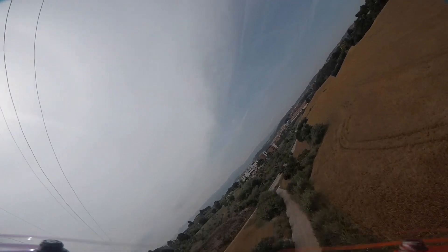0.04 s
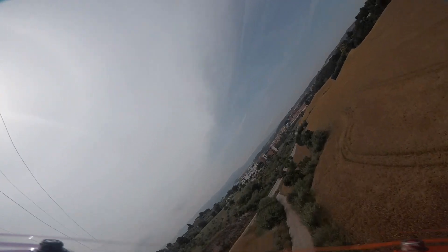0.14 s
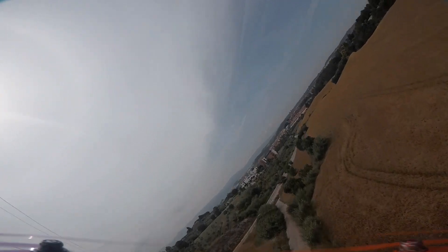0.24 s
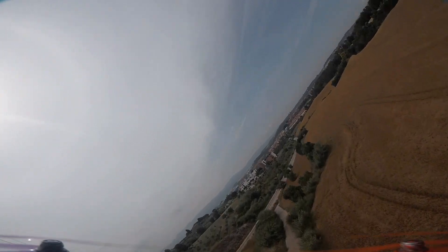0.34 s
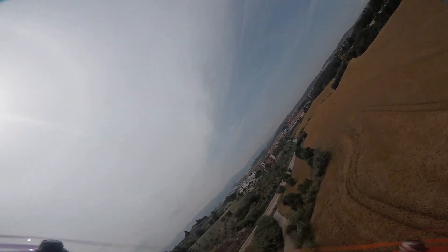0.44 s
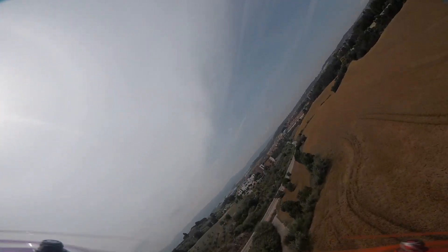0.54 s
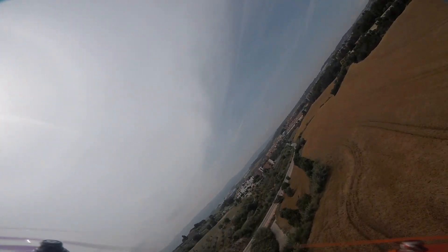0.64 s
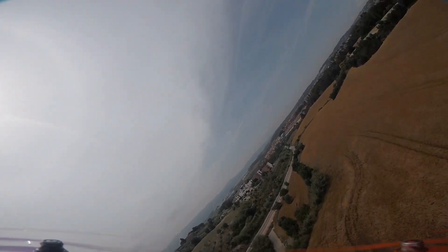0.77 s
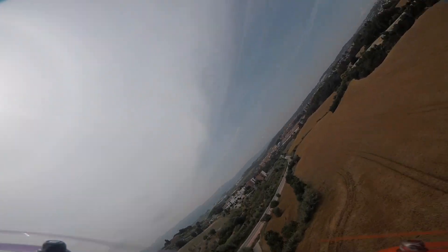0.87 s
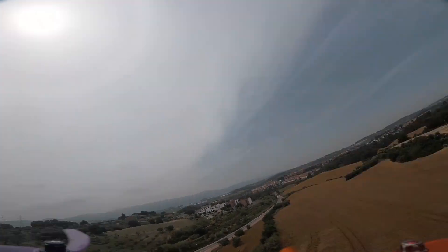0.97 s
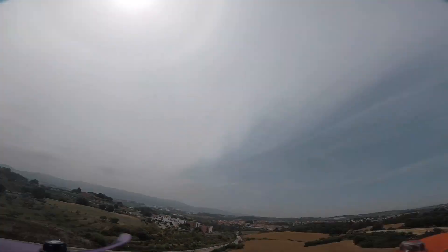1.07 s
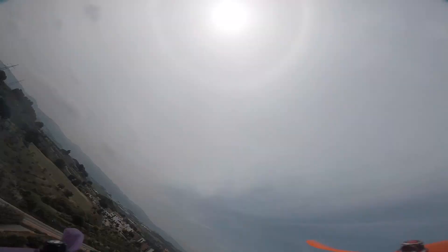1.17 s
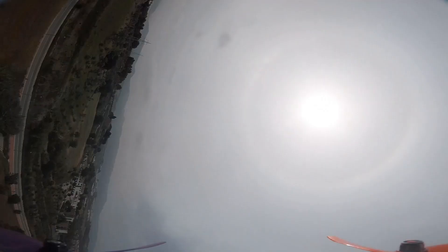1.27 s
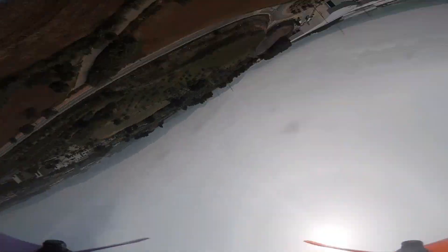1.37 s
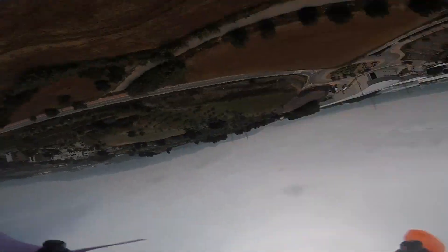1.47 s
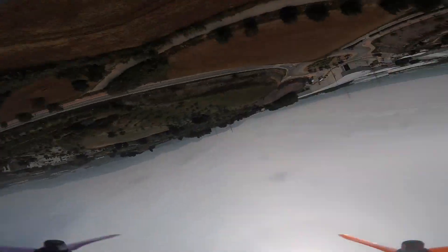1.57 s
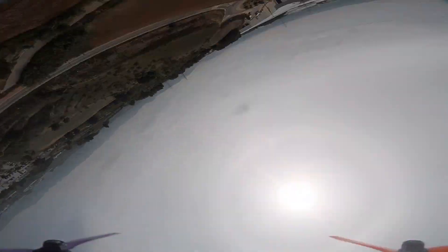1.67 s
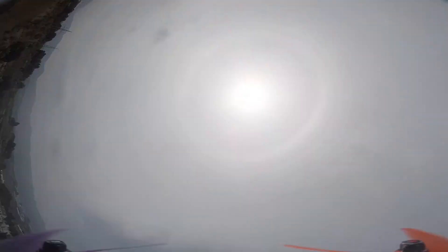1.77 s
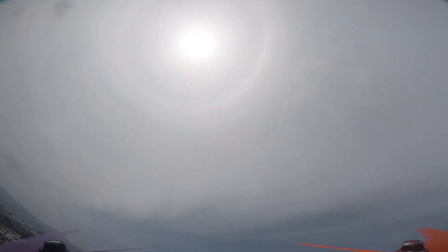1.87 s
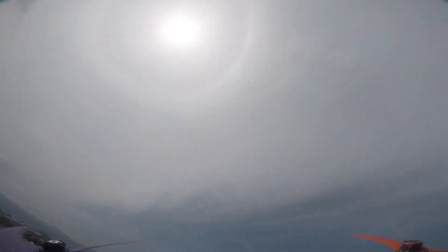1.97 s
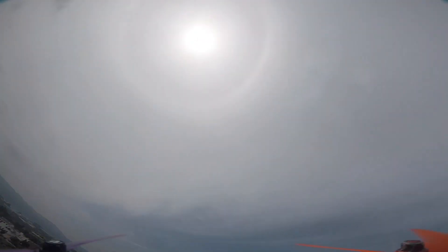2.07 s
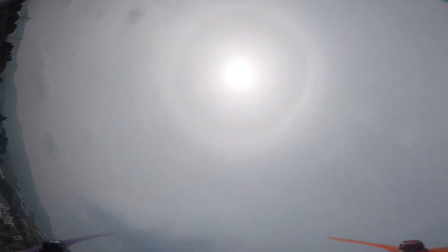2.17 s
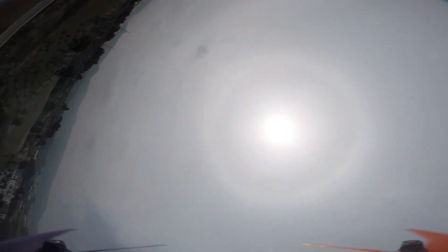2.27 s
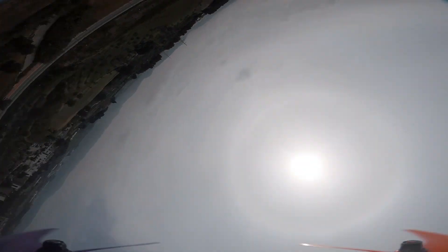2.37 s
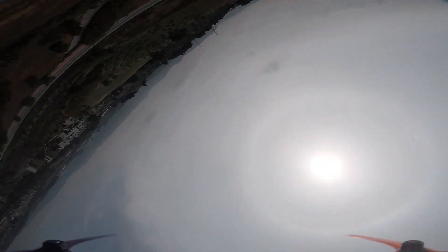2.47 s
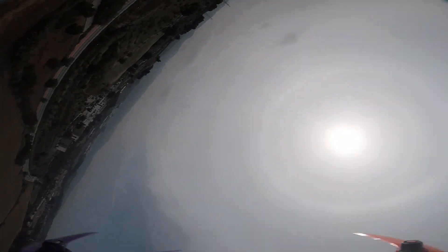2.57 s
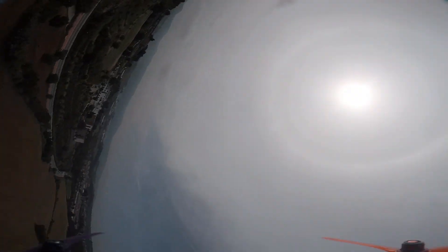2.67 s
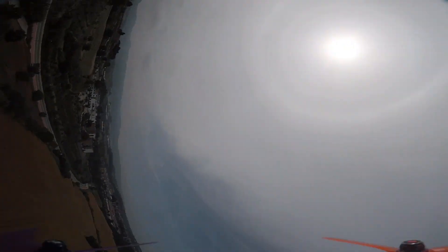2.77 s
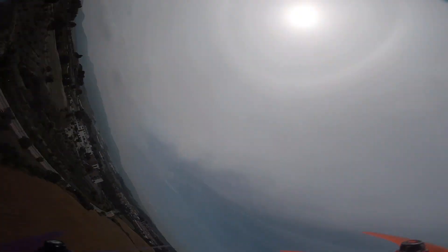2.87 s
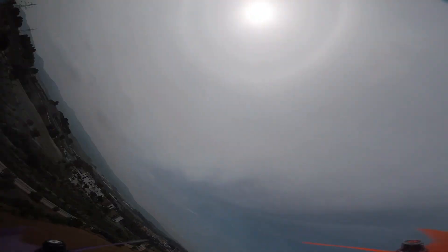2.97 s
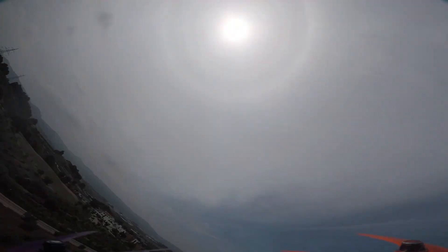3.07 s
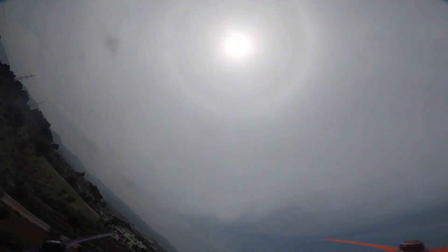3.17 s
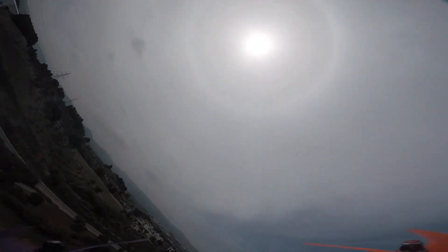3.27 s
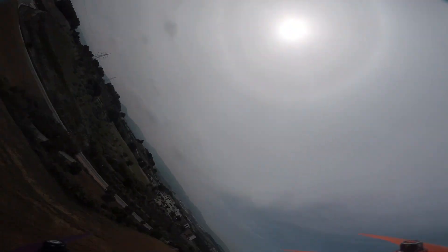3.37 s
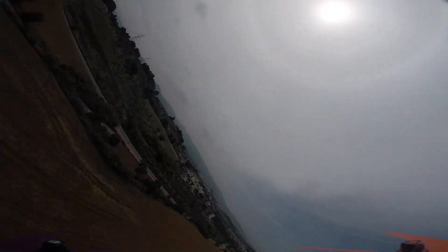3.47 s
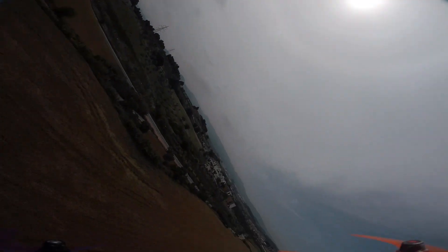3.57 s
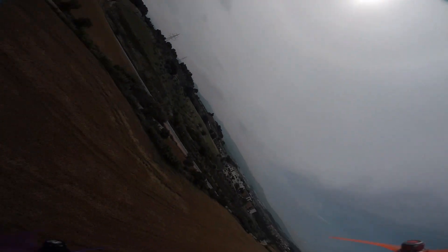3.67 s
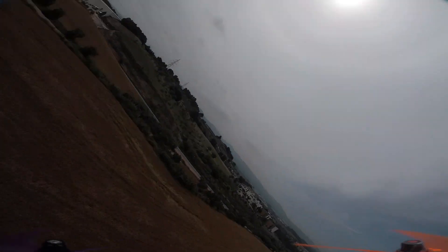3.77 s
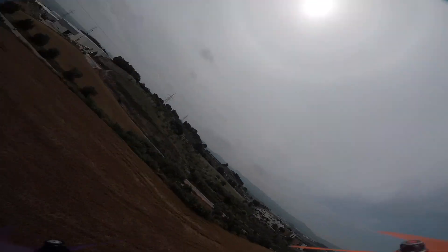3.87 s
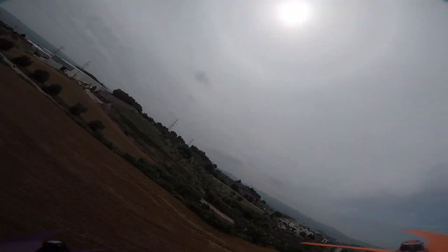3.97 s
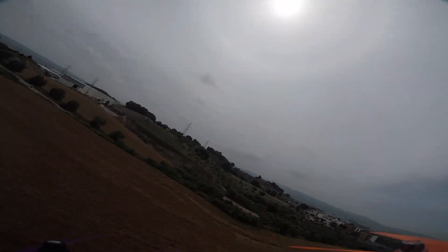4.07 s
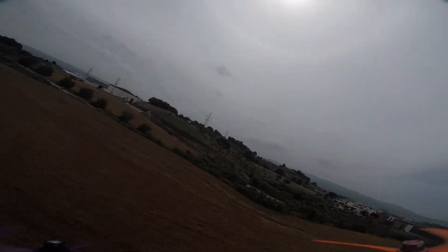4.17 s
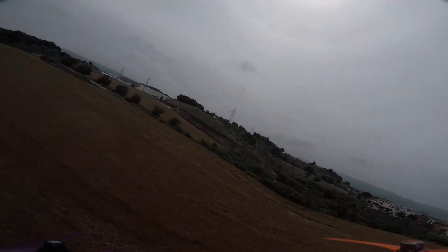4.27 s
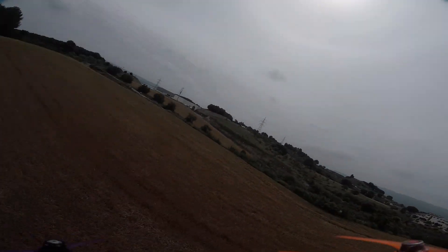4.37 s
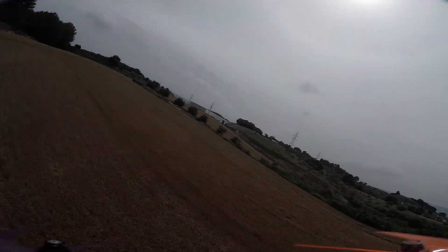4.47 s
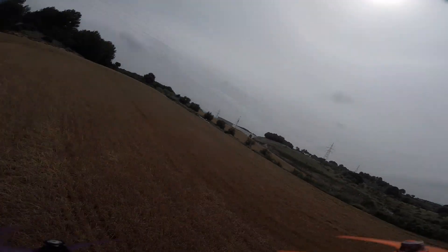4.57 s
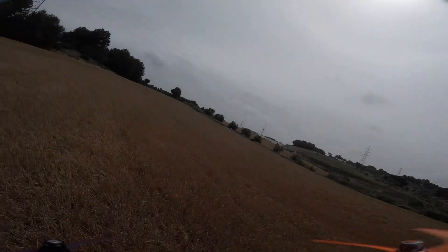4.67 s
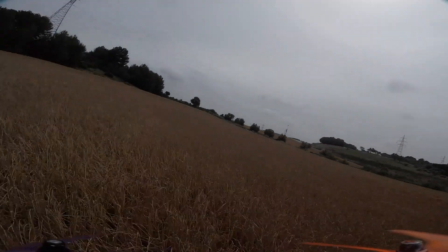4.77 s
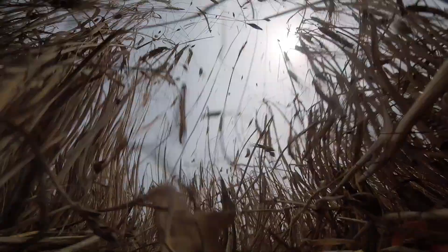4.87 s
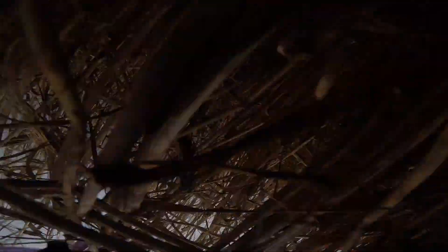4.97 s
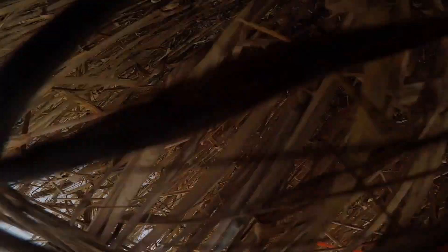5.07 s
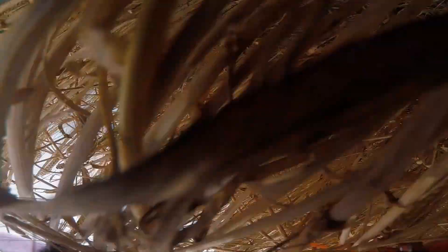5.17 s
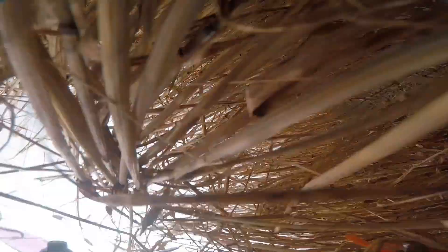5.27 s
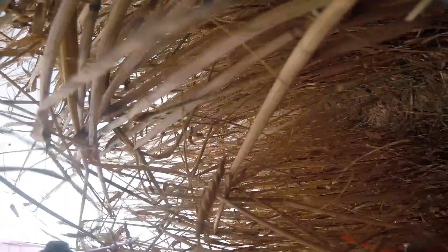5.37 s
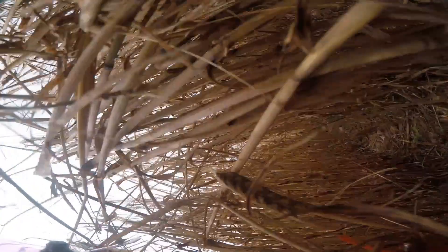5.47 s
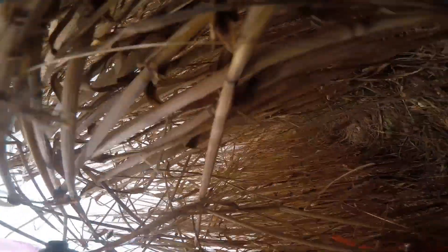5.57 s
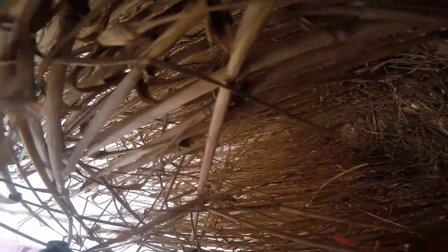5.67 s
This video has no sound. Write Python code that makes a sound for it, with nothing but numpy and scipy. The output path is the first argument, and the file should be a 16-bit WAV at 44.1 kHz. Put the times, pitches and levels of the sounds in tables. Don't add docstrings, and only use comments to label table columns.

```python
import sys
import numpy as np
from scipy import signal
from scipy.fft import rfft, irfft, next_fast_len
from scipy.io import wavfile
from scipy.ndimage import uniform_filter1d, map_coordinates

SR = 44100
rng = np.random.default_rng(int(sys.argv[2]) if len(sys.argv) > 2 else 0)


def ratio(d):
    e = np.asarray(d, float) / 20
    return 10 ** e


def file_out(sig):
    cols = np.atleast_2d(sig).T
    lim = np.clip(cols, -1, 1)
    pcm = np.round(lim * 32767).astype(np.int16)
    wavfile.write(sys.argv[1], SR, pcm)


N = 252869
T = np.arange(N) / SR


def unit(x):
    return x / np.sqrt(np.mean(x ** 2) + 1e-20)


def curves(rows, fade=0.0051):
    s, *cols = np.transpose(rows)
    opening = (T - s[0]) / fade + (s[0] == 0)
    closing = (s[-1] - T) / fade + 1
    gate = np.clip(np.minimum(opening, closing), 0, 1)
    return [np.interp(T, s, c) for c in cols], gate


def wobble(rate, times=T):
    return map_coordinates(rng.standard_normal(int(N * rate / SR) + 4), [times * rate])


def glide(points, times):
    s, v = np.transpose(points)
    return map_coordinates(v, [np.interp(times, s, np.arange(len(s)))], mode="nearest")


def coloured(x, spectrum):
    m = next_fast_len(N + 8192)
    f, db = np.transpose(spectrum)
    log_f = np.log(np.fft.rfftfreq(m, 1 / SR) + 1)
    gain = ratio(np.interp(log_f, np.log(f + 1), db))
    return unit(irfft(rfft(x, m) * gain, m)[:N])


def patchy(depth_db):
    z = signal.stft(rng.standard_normal(N + 512), nperseg=512)[2]
    field = uniform_filter1d(rng.standard_normal(z.shape), 6, 0)
    field = uniform_filter1d(field, 10, 1)
    return signal.istft(z * ratio(depth_db * unit(field)), nperseg=512)[1][:N]


def add(out, s, burst):
    part = out[round(s * SR):][:len(burst)]
    part += burst[:len(part)]


def full_throttle(rows, voice, run_down):
    coast_s, fade_bend = .12, 2.0
    s, hz, load_db, sixth_db = np.transpose(rows)
    t = np.linspace(0, s[-1] + coast_s, num=200)
    coast = np.clip((t - s[-1]) / coast_s, 0, 1)
    fade = coast ** fade_bend
    speed_lost, speed_bend = run_down
    speed = np.interp(t, s, hz) * (1 - speed_lost * coast ** speed_bend)
    shaft_db = voice[0] - 24 * fade
    blade_db = np.interp(t, s, load_db) - 30 * fade
    extra_db = np.interp(t, s, sixth_db)
    return np.transpose([t, speed, shaft_db, voice[1] + blade_db,
                         voice[2] + blade_db + extra_db, voice[3] + blade_db])


def hunting(speed, load, sixth_db, ninth_db):
    # shaft f/Hz, level/dB
    unbalance = [(65, -33), (87, -40.5), (101, -25.5), (117, -19), (138, -26), (153, -32), (163, -19),
                 (172, -11.5)]
    # shaft f/Hz, level/dB
    blade_pass = [(65, -20.5), (87, -20.5), (104, -22.5), (130, -18), (146, -20), (161, -27.5),
                  (173, -25.5)]
    t = np.linspace(speed[0][0], speed[-1][0], num=300)
    s, shake_db, load_db, slap_db = np.transpose(load)
    hz = glide(speed, t)
    octaves = np.log2(hz / 144.6)
    upper_db = 5.5 * octaves + np.interp(t, s, slap_db)
    shaft_db = np.interp(hz, *np.transpose(unbalance)) + np.interp(t, s, shake_db)
    blade_db = np.interp(hz, *np.transpose(blade_pass)) + np.interp(t, s, load_db)
    return np.transpose([t, hz, shaft_db, blade_db, sixth_db + upper_db, ninth_db + upper_db])


def kick(s, length, first_hz, last_hz, db):
    edge_db, step_db = 30, -17
    u = np.linspace(0, 1, num=30)
    hz = first_hz + (last_hz - first_hz) * u ** 2.1
    shaft_db = db - edge_db * np.maximum(abs(u - .3) - .15, 0) * 2
    blade_db = db - 3 - edge_db * abs(u - .7)
    return np.transpose([s + length * u, hz, shaft_db, blade_db, blade_db + step_db, blade_db + step_db * 2])


def motor(stretches, fall_db, second_db, whine, uneven_db):
    # shaft multiple, level/dB re 9th order
    blade_orders = [(12, -4), (15, -6.5), (18, -11), (21, -21.5), (24, -30.5), (27, -36)]
    # shaft multiple, level/dB re 6th order
    uneven_orders = [(4, -20.5), (5, -26), (7, -33.5), (8, -37)]
    tone, beat = np.zeros(N), np.zeros(N)
    for rows in stretches:
        (hz, shaft_db, blade_db, sixth_db, ninth_db), gate = curves(rows)
        on = gate > 0
        slow = np.clip(1 - hz / 300, 0, 1)
        lag = slow[on]

        jitter = (.0008 + .004 * lag) * wobble(25, T[on])
        turn = 2 * np.pi * np.cumsum(hz[on] * (1 + jitter)) / SR
        is_kick = rows[-1][0] - rows[0][0] < .2
        turn += (.03 + is_kick * .28) * wobble(90, T[on])
        eddies = 0.13 * wobble(350, T[on])
        blur = .09 * lag * wobble(60, T[on])

        levels = [(1, shaft_db), (2, shaft_db + second_db), (3, blade_db), (6, sixth_db - 0.5), (9, ninth_db)]
        steep = 1 - .12 * slow
        for k, db in blade_orders:
            slow_db = 2.5 if k > 18 else -7
            fall = fall_db * (k / 3 - 3)
            levels.append((k, ninth_db + (db - fall) * steep + slow_db * slow))
        levels += [(k, sixth_db + db + uneven_db) for k, db in uneven_orders]
        whine_order, whine_db = whine
        levels.append((whine_order, ninth_db + whine_db - 25 * slow))

        for k, db in levels:
            fast_db = 1.3 + (k > 3) * 2 * lag + (k > 6) * 2 * lag
            flutter_db = fast_db * wobble(35, T[on]) + (k > 6) * 5 * lag * wobble(7, T[on])
            low_speed_db = (3.5 if k < 6 else 6) * lag
            load = ratio(db[on] + low_speed_db + flutter_db) * (1 + (k > 2) * eddies)
            phase = k * (turn + (k > 9) * blur) + rng.uniform(0, 2 * np.pi)
            tone[on] += np.sqrt(2) * gate[on] * load * np.sin(phase)
        beat[on] += gate[on] * np.cos(3 * turn)
    return tone, beat


def four_motors():
    # t/s, shaft f/Hz, blade load level/dB, 6th order extra level/dB
    full_rows = [
        [(0.0, 445.0, -3, 2), (0.16, 446.0, -2, 1), (0.24, 447.2, -2, 1), (0.33, 450.6, -1, 0),
         (0.54, 453.5, 0, -1), (0.64, 453.0, 1, 0), (0.87, 453.9, 0, 0)],
        [(0.0, 426.5, -4, -8), (0.08, 428.0, -3, -8), (0.14, 426.0, -3, -8), (0.21, 428.3, -2, 2),
         (0.28, 424.0, -2, 0), (0.33, 421.3, 0, -2), (0.4, 423.5, 1, 0), (0.52, 425.5, 2, 0),
         (0.64, 424.3, 0, 0), (0.74, 424.6, -1, 0), (0.87, 422.6, -2, 0)],
        [(0.0, 392.0, 0, -2), (0.14, 389.8, -3, 4), (0.24, 391.0, -4, 4), (0.33, 384.3, -5, 2),
         (0.44, 391.0, -1, 0), (0.5, 390.3, -2, -1), (0.6, 393.0, 4, -3), (0.65, 390.0, -4, 2),
         (0.76, 394.0, 2, -3), (0.81, 392.0, 1, 0), (0.87, 393.0, 1, 0)],
        [(0.0, 410.7, -12, 14), (0.08, 412.5, -13, 12), (0.125, 415.0, -11, 21), (0.16, 417.5, -9, 12),
         (0.2, 418.0, -10, 0), (0.235, 419.5, -7, 0), (0.27, 421.0, 1, -3), (0.32, 424.0, 0, 0),
         (0.44, 425.0, 2, 0), (0.56, 428.0, 3, 0), (0.68, 427.3, 3, 0), (0.76, 429.0, 4, 0),
         (0.87, 429.0, 4, 0)],
    ]
    # unbalance level/dB, blade-pass level/dB, 6th level/dB, 9th level/dB
    voices = [(-11, -26.5, -32.5, -42.5), (-25, -22.5, -32.5, -41.5), (-25, -32, -38, -44),
              (-32.5, -32, -38, -37)]
    run_downs = [(.58, 1.25), (.6, 1.5), (.62, 1.4), (.68, 1.0)]
    # shaft multiple, level/dB re 9th order
    whines = [(18, -7), (14, -13), (18, -12), (14, -22)]
    # t/s, shaft f/Hz
    speed_front_left = [(1.5, 63.3), (1.7, 86.5), (1.8, 112.0), (1.87, 131.0), (1.95, 126.0), (2.03, 119.0),
                        (2.1, 117.2), (2.3, 134.0), (2.4, 131.0), (2.5, 121.0), (2.66, 105.5),
                        (2.78, 102.5), (2.9, 111.5), (3.1, 131.0), (3.2, 137.3), (3.3, 140.0), (3.4, 142.0),
                        (3.5, 141.3), (3.6, 137.5), (3.7, 130.7), (3.8, 130.5), (3.9, 135.3), (4.0, 146.0),
                        (4.1, 154.7), (4.2, 160.5), (4.3, 163.7), (4.4, 168.5), (4.5, 171.5), (4.6, 172.0),
                        (4.7, 173.0), (4.9, 174.0)]
    speed_front_right = [(1.8, 76.0), (1.86, 88.5), (1.95, 88.0), (2.08, 88.0), (2.19, 98.8), (2.32, 117.0),
                         (2.43, 122.0), (2.6, 110.0), (2.73, 99.5), (2.84, 99.5), (2.97, 109.0),
                         (3.1, 121.0), (3.2, 129.5), (3.3, 134.5), (3.4, 136.0), (3.5, 138.0), (3.6, 137.5),
                         (3.75, 138.0), (3.85, 140.5), (3.97, 145.5), (4.14, 152.0), (4.3, 161.3),
                         (4.4, 167.0), (4.5, 169.8), (4.6, 170.2), (4.7, 170.5), (4.8, 171.5), (4.9, 172.0)]
    speeds_rear_left = [
        [(1.68, 65.0), (1.8, 82.5), (1.92, 100.0), (2.04, 103.5)],
        [(3.0, 100.2), (3.16, 113.9), (3.32, 124.4), (3.48, 125.4), (3.76, 121.5), (3.92, 129.5), (4.0, 137.5),
         (4.1, 144.5), (4.2, 149.5), (4.3, 151.7), (4.4, 156.3), (4.5, 160.2), (4.6, 160.5), (4.7, 161.0),
         (4.8, 162.3), (4.89, 162.5)],
    ]
    speed_rear_right = [(4.3, 171.0), (4.4, 176.3), (4.5, 178.5), (4.6, 178.8), (4.72, 179.2),
                        (4.89, 179.5)]
    # t/s, frame shake level/dB, load level/dB, slap level/dB
    load_front_left = [(1.499, -11, -10, -2), (1.56, -13, -5, -1), (1.619, -4, 0.5, 0), (1.7, 1, -1, -8),
                       (1.78, -14, -3, -6), (1.87, -6, -9.5, -0.5), (1.97, -16, -8, -3.5),
                       (2.1, -21.5, -18, -5.5), (2.271, -9, -1.5, 7), (2.34, 2, 3.5, -11),
                       (2.449, -7.5, 3, 2), (2.53, -14, 3, -6), (2.62, -16.5, 2, -8), (2.7, -7, 4, 6.5),
                       (2.8, -10, 0, -1.5), (2.9, -16, 1.5, 4.5), (3.1, -14, 3, 0.5), (3.25, -8, 1, 3),
                       (3.4, -4, -3.5, 3.5), (3.55, 7, 0.5, -5), (3.799, 1.5, -4.5, -4.5),
                       (3.95, 0, 3, 5.5), (4.1, 3, -5.5, -2.5), (4.27, -1, 5, 4.5), (4.35, -2.5, 7, 5.5),
                       (4.6, 4, 1.5, 8), (4.8, -1.5, -6, 3.5)]
    load_front_right = [(1.8, -0.5, -1, -1), (1.86, 2, 8, 0), (1.97, -1, -1.5, -5), (2.13, -4, 5.5, 3.5),
                        (2.2, 2.5, 0, 10), (2.38, -1.5, -2, -2.5), (2.5, 5.5, -6.5, 4), (2.6, 8, -9, -3),
                        (2.719, 12, -4.5, -2), (2.85, 4, -1.5, -2), (3.0, 8, -4.5, -2), (3.3, 0.5, -1, -2),
                        (3.5, 3.5, 4.5, -0.5), (3.75, -1, 0.5, -5.5), (4.141, -8.5, 8.5, 3.5),
                        (4.25, -9, 8.5, -3.5), (4.4, -16.5, -8, -2.5), (4.6, -27.5, -8, -8),
                        (4.8, -18, -4.5, 3.5)]
    load_rear_left = [(1.681, -4, -6.5, 6.5), (1.921, -17, 1.5, 0), (2.04, -13, -13, 0),
                      (3.101, 5, -0.5, 6.5), (3.479, -12.5, -9, -17.5), (3.8, 0, -1, -2),
                      (4.0, 8.5, -3.5, -1.5), (4.15, -4, 1.5, -2), (4.3, 7, -7, 0.5),
                      (4.42, 1.5, -10.5, -2.5), (4.6, -2, -11, -0.5), (4.799, 3.5, -16.5, 6)]
    load_rear_right = [(4.3, -22.5, -14.5, -20), (4.42, -23, -16.5, 0), (4.6, -19, -11.5, -1.5),
                       (4.75, -24, -14.5, -4), (4.89, -27.5, -14, -5)]
    # t/s, length/s, first f/Hz, last f/Hz, level/dB
    kicks = [
        (1.213, 0.075, 481, 443, -20.5),
        (1.439, 0.04, 434, 402, -23.5),
    ]
    kick_octaves = [-35, -1]

    full = [full_throttle(*one) for one in zip(full_rows, voices, run_downs)]
    front_left = [full[0], hunting(speed_front_left, load_front_left, sixth_db=-37, ninth_db=-41.5)]
    front_right = [full[1], hunting(speed_front_right, load_front_right, sixth_db=-37.0, ninth_db=-41)]
    rear_left = [full[2]]
    for speed in speeds_rear_left:
        rear_left.append(hunting(speed, load_rear_left, sixth_db=-34.5, ninth_db=-48.0))
    rear_right = [full[3], hunting(speed_rear_right, load_rear_right, sixth_db=-42.5, ninth_db=-50)]

    motors = [motor(front_left, 1.1, second_db=-43.0, whine=whines[0], uneven_db=-1.0),
              motor(rear_left, 2.3, second_db=-27.5, whine=whines[2], uneven_db=-8.5),
              motor(front_right, 0.39, second_db=-13.5, whine=whines[1], uneven_db=6),
              motor(rear_right, 0.74, second_db=-9.5, whine=whines[3], uneven_db=-5)]
    for row, db in zip(kicks, kick_octaves):
        motors.append(motor([kick(*row)], 0.55, second_db=db, whine=whines[3], uneven_db=1))
    return np.sum(motors, axis=0)


def rattle(tone):
    # f/Hz, level/dB
    mount = [(200, -63), (330, 9.5), (600, 6), (900, -29)]
    shake = coloured(tone, mount) ** 2
    return 0.017 * (shake - uniform_filter1d(shake, size=200))


def crash():
    # t/s, splinter level/dB, hollow knock level/dB, thud level/dB, thud f/Hz
    blows = [
        (4.855, -18.5, -16.5, -23, 170),
        (4.859, -21, -17, -17, 170),
        (4.8654, -16, -4, -15.5, 170),
        (4.8785, -16, -10, -10, 170),
        (4.8882, -18.5, -11, -10, 181),
        (4.9003, -37, -37, 7.5, 85),
        (4.904, -42, -46, -24, 120),
        (4.9164, -50, -43.5, 0.5, 130),
        (4.929, -52, -47, -4.5, 110),
    ]
    # f/Hz, level/dB per Hz
    crack_colour = [(600, -36), (1300, 5), (2500, 6.5), (3500, -3), (5500, -11.5), (8500, -1.5),
                    (12000, -14), (15000, -30), (16000, -59)]
    # f/Hz, level/dB per Hz
    knock_colour = [(150, -27), (400, -7), (900, 1), (1200, -6), (2200, -41.5)]
    out, t = np.zeros(N), T[:SR // 8]
    splinter = coloured(rng.standard_normal(N), crack_colour)
    hollow = coloured(rng.standard_normal(N), knock_colour)
    for s, db, knock_db, thud_db, hz in blows:
        start = round(s * SR)
        at = slice(start, start + len(t))
        crack = splinter[at] * ratio(db + 2 - 60 * t / .022) * (1 - np.exp(-t / .0007))
        knock = hollow[at] * ratio(knock_db - 60 * t / .035) * (1 - np.exp(-t / .001))
        thud = ratio(thud_db - 4.5 - 60 * t / 0.026) * np.sin(2 * np.pi * hz * t)
        add(out, s, crack + knock + thud)
    return out


def lurching():
    # t/s, rocking level/dB, rubbing level/dB, crackle level/dB, decay/(dB/s)
    lurches = [(4.893, -11, -24, -44, 350), (4.93, -24, -30, -53, 153), (4.97, -44, -34, -54, 100),
               (5.02, -42, -46, -52, 125), (5.065, -33.5, -39, -66, 350), (5.13, -46, -58, -58, 100),
               (5.21, -46, -55, -52.5, 103), (5.25, -31.5, -44, -53, 220), (5.319, -20, -34, -51.5, 265),
               (5.4, -33, -42, -62, 217), (5.46, -50, -54, -65.5, 60), (5.53, -37, -57, -65, 158),
               (5.6, -50, -65, -66, 33)]
    power = 0
    for s, *db, dying in lurches:
        envelope_db = np.minimum(391 * (T - s), dying * (s - T))
        power = power + np.outer(ratio(db), ratio(envelope_db)) ** 2
    return np.sqrt(power) * np.clip((T - lurches[0][0]) / 0.0019 + 1, 0, 1)


def straw():
    # f/Hz, level/dB per Hz
    rocking_colour = [(8.8, -19), (15, -3), (43, 6), (59, -1.5), (126, 6.5), (400, -24.5), (520, -51),
                      (880, -120)]
    rubbing_colour = [(120, -25), (200, -5), (347, -26), (497, -17), (1800, -48.5), (2340, -72),
                      (3960, -120)]
    crackle_colour = [(590, -14), (1000, 0.5), (1820, -3), (2770, -5.5), (3900, -6.5), (4900, -15),
                      (6300, -11.5), (8590, -14.5), (14300, -34.5)]
    # t/s, peak level/dB, f/Hz
    snaps = [(4.925, -38, 3900), (4.946, -42, 3700), (4.952, -43, 3400), (4.984, -42, 4000),
             (5.018, -34, 1500), (5.04, -44, 2500), (5.13, -47, 2570), (5.58, -51, 6500),
             (5.246, -46, 2880), (5.695, -47, 2600), (5.696, -53, 6500), (5.7205, -45.5, 6300),
             (5.7206, -55, 2500), (5.7207, -56, 8500)]
    # t/s, peak level/dB, f/Hz
    knocks = [
        (5.032, -34, 540),
        (5.072, -31, 700),
        (5.225, -41, 490),
        (5.246, -36, 440),
        (5.304, -22, 530),
        (5.352, -28, 540),
        (5.394, -30, 514),
        (5.49, -45, 540),
    ]
    # t/s, peak level/dB, f/Hz
    squeaks = [(5.191, -45, 2800), (5.193, -51, 1450), (5.197, -41, 2550), (5.199, -50, 5700),
               (5.203, -40, 2270), (5.216, -49, 2010), (5.222, -52, 3000), (5.492, -55, 5600),
               (5.495, -58, 3120), (5.5, -63, 2150), (5.503, -59, 4300)]
    rock, rub, crunch = lurching()
    clumps = ratio(2.2 * wobble(150))
    rocking = rock * coloured(patchy(0.45), rocking_colour)
    rubbing = rub * coloured(clumps * patchy(2.2), rubbing_colour)
    crackle = crunch * coloured(clumps * ratio(1.4 * wobble(38)) * patchy(1.9), crackle_colour)
    out, t = rocking + rubbing + crackle, T[:SR // 20]
    for events, cycles in ((snaps, 18), (knocks, 12), (squeaks, 70)):
        for s, db, hz in events:
            rise = 1 - np.exp(-hz * t / 0.55)
            add(out, s, ratio(db - 60 * hz * t / cycles) * rise * np.sin(2 * np.pi * hz * t))
    return out


def wake():
    # start t/s, peak t/s, end t/s, first f/Hz, last f/Hz, width/Hz
    whoosh = (1.77, 1.815, 1.96, 5300, 3300, 500)
    # t/s, peak level/dB, f/Hz
    slaps = [
        (1.158, -13, 121),
        (1.183, 0, 163),
        (1.203, -4.5, 186),
        (1.221, 5, 191),
        (1.383, -5, 153),
        (1.42, -2, 180),
        (1.515, -11, 127),
        (1.545, 0, 172),
        (1.707, -13, 269),
    ]
    start, peak, end, first_hz, last_hz, width_hz = whoosh
    sweep = 2 * np.pi * np.cumsum(np.interp(T, [peak, end], [first_hz, last_hz])) / SR
    swell = np.interp(T, [start, peak, end], [0, 1, 0]) ** .5
    out = ratio(-42) * swell * unit(wobble(2 * width_hz)) * np.sqrt(2) * np.sin(sweep)
    t = T[:SR // 20]
    for s, db, hz in slaps:
        decay = ratio(db - 1.5 - 60 * hz * t / 8.7)
        add(out, s, decay * np.sin(2 * np.pi * hz * t))
    return out


def airflow():
    # t/s, turbulence level/dB, thrust level/dB
    flow_rows = [(0.0, -30, -42.5), (0.15, -31, -39), (0.4, -30.5, -42.5), (0.6, -30.5, -39.5),
                 (0.86, -33, -39), (0.92, -29, -39), (1.0, -29, -49.5), (1.28, -28.5, -47),
                 (1.33, -20.5, -51), (1.5, -32.5, -48), (1.64, -32, -46.5), (1.82, -18.5, -36.5),
                 (1.95, -18, -42.5), (2.5, -19, -34), (2.85, -14, -41), (3.1, -18.5, -37.5),
                 (3.4, -17.5, -37.5), (4.0, -17.5, -37), (4.3, -17, -32), (4.8, -21.5, -35.5),
                 (4.893, -17.5, -36)]
    # t/s, half width/s, buffet level/dB, wash level/dB, swish level/dB
    gusts = [(0.01, 0.091, 1, 4, -2), (0.14, 0.027, 7, 1, 2), (0.2, 0.048, 3, 1.5, -3),
             (0.26, 0.068, 10.5, -7, 4), (0.932, 0.092, -7, 10, 5.5), (1.15, 0.21, 1, 4.5, 17.5),
             (1.2, 0.062, 14.5, 16.5, 0), (1.25, 0.021, 5, -5, 9), (1.277, 0.014, 4, -17, 9),
             (1.309, 0.043, 12, 3, 0), (1.384, 0.02, 2.5, 1, 9), (1.42, 0.026, 1, -1.5, 11),
             (1.43, 0.073, 15.5, 15, -0.5), (1.515, 0.018, 14.5, 3, -2), (1.55, 0.0049, 11, 2, -6),
             (1.53, 0.12, 6, -0.5, 1), (1.6, 0.056, 11.5, 1, -3), (1.715, 0.0055, 2, 7, 5),
             (1.74, 0.065, 14, 3, -2), (1.95, 0.13, -9, 4.5, 3.5), (2.3, 0.21, 4.5, 0, 2),
             (2.5, 0.12, -8, -4.5, -1.5), (2.62, 0.11, -5, -2.5, 2), (2.7, 0.17, 3, -1.5, 1),
             (2.82, 0.05, -0.5, 0.5, 1), (2.88, 0.025, -3.5, 4, 5.5), (4.4, 0.09, 1.5, 2.5, 4),
             (2.52, 0.1, 1, -3, 0.5), (3.7, 0.27, 1.5, -1, -2.5), (4.88, 0.032, 6, 5, -1)]
    (turbulence_db, thrust_db), gate = curves(flow_rows)
    gust_db = sum(np.outer(db, np.clip(1 - abs(T - s) / half, 0, 1)) for s, half, *db in gusts)
    buffet_db = turbulence_db + 1 + gust_db[0]
    wash_db = turbulence_db + gust_db[1]
    swish_db = thrust_db + 3 + gust_db[2]
    return (buffet_db, wash_db, swish_db, thrust_db), gate


def air(beat):
    # f/Hz, level/dB per Hz
    buffet_colour = [(8.8, -63.5), (15, -2.5), (107, 9), (162, -5), (210, 0), (312, -17), (400, -25),
                     (520, -4), (880, -120)]
    wash_colour = [(88, -10.5), (150, 2), (177, -2), (270, -4), (350, -1.5), (761, -13.5), (2500, -34),
                   (3250, -36), (5500, -120)]
    swish_colour = [(530, -23.5), (900, 0.5), (1050, -8), (1510, -8), (2050, -10), (2900, -10),
                    (5500, -19.5), (7150, -56), (12100, -120)]
    hiss_colour = [(2060, -3.5), (3500, -5.5), (4830, -11.5), (6310, -1.5), (7570, -4), (10000, -15.5),
                   (11700, -27), (13900, -33), (15000, -56.5)]
    # f/Hz, level/dB per Hz
    fizz_colour = [(7000, -40.5), (9000, -2.5), (10500, -5.5), (12500, -11), (15000, -31)]
    (buffet_db, wash_db, swish_db, hiss_db), gate = airflow()
    lumps = ratio(1.1 * wobble(30))
    buffet = ratio(buffet_db) * coloured(lumps * patchy(0.24), buffet_colour)
    wash = ratio(wash_db) * coloured(lumps * patchy(1.7), wash_colour)
    swish = ratio(swish_db) * coloured(ratio(2.5 * beat) * patchy(1.5), swish_colour)
    hiss = ratio(hiss_db) * coloured(ratio(2.46 * beat) * patchy(0.93), hiss_colour)
    fizz = ratio(-48.5 - 38.5 * T) * coloured(ratio(2.4 * beat) * patchy(1.2), fizz_colour)
    flow = buffet + wash + swish + hiss + fizz
    gap_band = signal.butter(2, (1760, 2080), "bandpass", fs=SR, output="sos")
    gap = signal.sosfiltfilt(gap_band, flow)
    forward_flight = np.clip((.88 - T) / .03, 0, 1)
    return gate * (flow - .7 * forward_flight * gap)


def scene():
    tone, beat = four_motors()
    mix = tone + rattle(tone) + air(beat) + wake() + crash() + straw()
    return mix[None]


def low_pass(x):
    return signal.sosfilt(signal.butter(12, 15100, fs=SR, output="sos"), x)


def record(dry):
    soft = dry / (1 + np.abs(dry / .98) ** 5) ** (1 / 5)
    band_limit = signal.butter(16, 15000, fs=SR, output="sos")
    band = signal.sosfiltfilt(band_limit, soft)
    return low_pass(band)


dry = scene()
out = record(dry)
file_out(out)
```